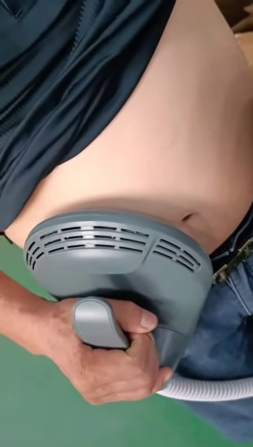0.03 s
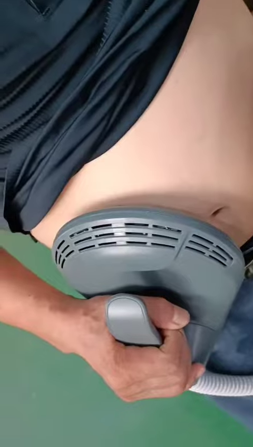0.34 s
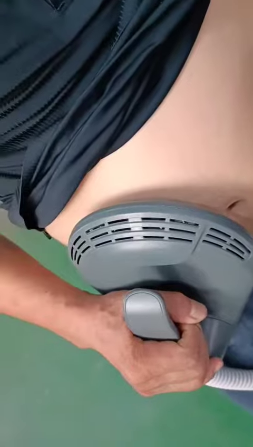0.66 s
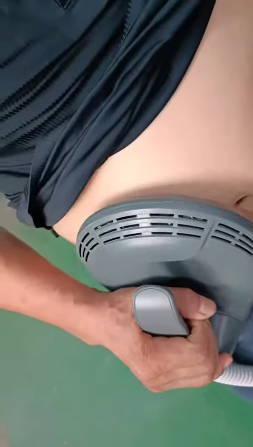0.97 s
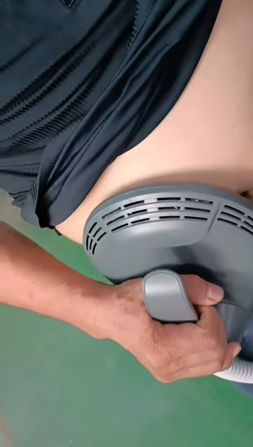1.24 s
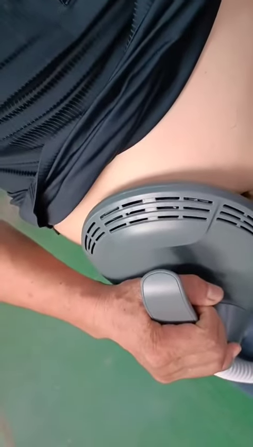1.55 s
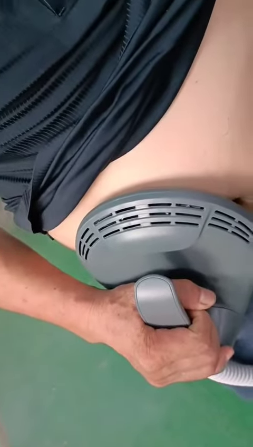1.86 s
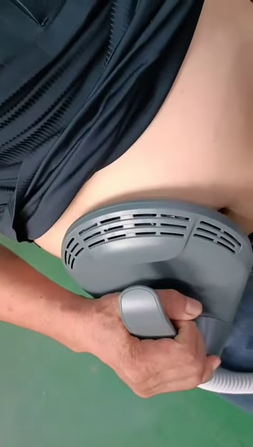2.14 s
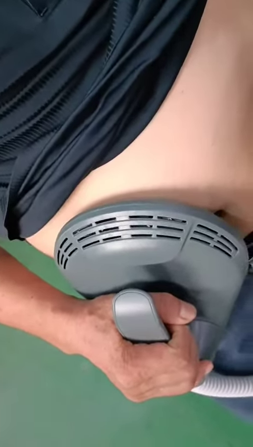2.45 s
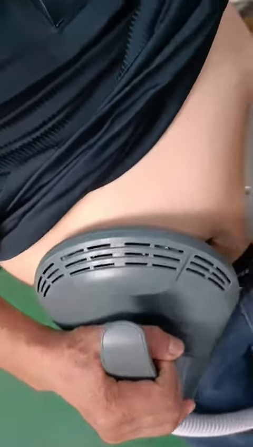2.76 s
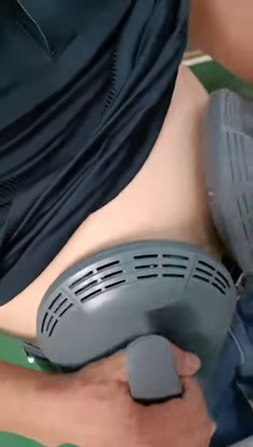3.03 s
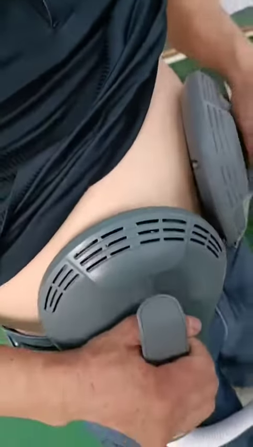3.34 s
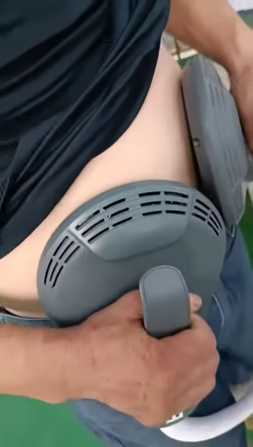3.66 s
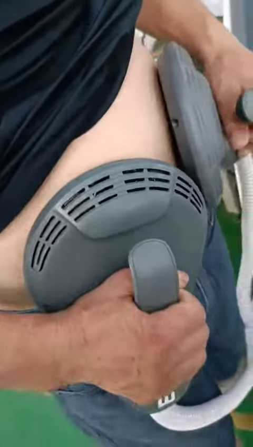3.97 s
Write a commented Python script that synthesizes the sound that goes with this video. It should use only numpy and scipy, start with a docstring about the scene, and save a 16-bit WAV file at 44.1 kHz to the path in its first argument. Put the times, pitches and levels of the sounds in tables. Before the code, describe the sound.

A handheld pulse device knocks and rattles close by in a room. At first there is only rushing fan air and a low rumble. At 0.7 seconds, with a soft handling bump, rapid, even plastic knocks begin, about 25 a second, and continue throughout. Near 3 seconds they turn rounder and roomier as the air grows louder. A rough swell and thin squeal come at about 3.9 seconds.

```python
"""A handheld magnetic-pulse applicator lies on a belly, cooling air rushing through its hose in a busy room.
At 0.7 s, with a soft handling bump, its coil starts to fire about 25 times a second; each pulse knocks
the plastic shell, which snaps, rings in its modes and rattles. Near 3 s the shell turns from the
microphone and the knock grows rounder and roomier. A rough swell with a thin squeal ends the scene."""
import sys
import numpy as np
from scipy import signal
from scipy.fft import rfft, irfft, next_fast_len
from scipy.io import wavfile

SR = 44100
rng = np.random.default_rng(int(sys.argv[2]) if len(sys.argv) > 2 else 0)


def transcribe(signal):
    """Save signal, clipped to [-1, 1], as a 16-bit WAV file at the path in sys.argv[1]."""
    frames = np.atleast_2d(signal).T
    limited = np.clip(frames, -1, 1)
    pcm = np.round(limited * 32767).astype(np.int16)
    wavfile.write(sys.argv[1], SR, pcm)


N = 176400
TIME = np.arange(N) / SR

# low rumble: (frequency [Hz], relative level [dB]) and (time [s], level [dB])
RUMBLE_SPECTRUM = [(20, -36), (45, -14.5), (100, -5.5), (160, -3), (220, 2.5), (310, -0.5), (400, -11),
                   (520, -6), (800, -14.5), (2000, -60)]
RUMBLE_ENVELOPE = [(0, -36.5), (.3, -41), (.52, -40.5), (.65, -34), (.7, -39), (1, -48.5), (1.6, -47.5),
                   (1.85, -43.5), (2.4, -48), (2.85, -38.5), (3.4, -40), (3.8, -43), (4, -40)]
# dull swells: (time [s], half-length [s], frequency [Hz], half-width [Hz], level [dB])
DULL_SWELLS = [(0.166, 0.027, 215, 70, -37), (0.312, 0.014, 160, 70, -33), (0.46, .01, 250, 100, -38),
               (0.638, 0.023, 590, 147, -30.5), (3.666, 0.066, 194, 67, -34), (3.928, 0.049, 246, 155, -26),
               (3.92, 0.077, 950, 775, -25)]
# cooling air: (frequency [Hz], relative level [dB]) and (time [s], level [dB])
AIR_SPECTRUM = [(200, -17), (350, -8.5), (520, -3.5), (730, -7), (1120, -6.5), (1230, -7), (1520, -5),
                (2450, -9), (3060, -16.5), (3700, -23), (4400, -18), (5200, -66), (8000, -70)]
AIR_ENVELOPE = [(0, -33), (.3, -32.5), (.66, -31.5), (.68, -38.5), (1.6, -41), (1.8, -40.5), (2.5, -41.5),
                (2.9, -32), (3.8, -32), (4, -29.5)]
# fan tones: (frequency [Hz], level relative to the air [dB], half-width [Hz])
FAN_TONES = [(1100, -10.5, 33), (1800, -18, 20), (2615, -19, 9.1), (3005, -20, 16), (6220, -27.5, 36),
             (5850, -41.5, 28)]
# vent hiss: (frequency [Hz], relative level [dB]) and (time [s], level [dB])
HISS_SPECTRUM = [(3000, -29), (4300, -10.5), (5000, -2), (6300, -5), (7800, -1), (9400, 2.5), (10500, -7.5),
                 (11800, -11), (12300, -35)]
HISS_ENVELOPE = [(0, -44.5), (.66, -47), (.8, -54), (1.6, -53.5), (1.85, -54), (2.5, -57), (3, -48),
                 (4, -62)]
# reverberation time of the room: (frequency [Hz], T60 [s])
ROOM_DECAY = [(300, 0.22), (1500, 0.51), (4000, 0.047), (10000, 0.41)]
# strength of the knocks: (time [s], gain [dB])
KNOCK_GAIN = [(.7, -1), (1.2, -1.5), (1.5, -3.5), (1.69, -4), (1.78, 0.5), (2.2, 0.16), (2.6, -1.4),
              (2.9, 0.5), (3.4, 0.5), (3.7, -0.5), (3.87, -0.5), (3.97, -3)]
# angle of the shell to the microphone: (time [s], turn [0 facing, 1 turned away])
SHELL_TURN = [(1.9, 0.4), (2.4, 0.27), (2.68, 0.45), (2.85, 0.89), (3.05, 1)]
# bright snap and housing rattle, each: (frequency [Hz], relative level [dB])
SNAP_SPECTRUM = [(3000, -49), (5000, -25), (7500, -8), (8700, -14.5), (9600, 6.5), (10600, 4), (11700, -1),
                 (12100, -14)]
RATTLE_SPECTRUM = [(350, -50), (600, -6.5), (1500, -3), (2400, -6.5), (3300, -5), (4300, -13),
                   (5000, -24.5), (5700, -16.5), (7400, -23), (8700, -11), (9400, -4), (10200, -12),
                   (11800, -19), (12200, -40.5)]
# shell modes: (frequency [Hz], T60 [s], gain facing [dB], gain turned away [dB])
SHELL_MODES = [(560.7, 0.021, -7.5, -3.5), (699.4, 0.044, -14, -6.5), (880, 0.044, -18, -14.5),
               (1060, 0.022, -4.5, -8), (1297, 0.029, -9, -8.5), (1440, 0.05, -20.5, -23.5),
               (1553, 0.017, -13, -12.5), (1698, 0.03, -15.5, -16), (1840, 0.041, -31, -26),
               (2050, 0.021, -25, -16.5), (2384, 0.028, -15, -15.5), (2467, 0.031, -11.5, -14.5),
               (2750, 0.021, -37, -16.5), (3076, 0.019, -33, -19.5), (3490, 0.009, -36, -25),
               (4120, 0.01, -20.5, -16.5)]
# radiation lobes sweeping past the microphone: (time [s], half-length [s], frequency [Hz], gain [dB])
RADIATION_LOBES = [(2.86, 0.35, 781, 12.5), (2.66, 0.076, 1220, -5), (3.24, 0.22, 1300, 4),
                   (2.67, 0.16, 1590, 5), (3.23, 0.11, 1760, 8.5), (2.94, 0.12, 952, 6),
                   (2.62, 0.15, 2470, 3.5), (3.05, 0.37, 2450, -4.5)]


def amp(db):
    """Amplitude ratio of a level in decibels."""
    return 10 ** (np.asarray(db) / 20)


def unit(x):
    """Normalisation to an rms of 1."""
    return x / np.sqrt(np.mean(x ** 2) + 1e-20)


def along(points, hz):
    """Interpolation of (frequency [Hz], value) points on a logarithmic axis."""
    frequencies, values = np.transpose(points)
    return np.interp(np.log(hz + 1), np.log(frequencies + 1), values)


def at(points, s):
    """Linear interpolation of (time [s], value) points."""
    return np.interp(s, *np.transpose(points))


def bell(x, centre, half_width):
    """Gaussian curve of height 1, falling to 1/e at the half-width."""
    return np.exp(-((x - centre) / half_width) ** 2)


def filtered(x, response):
    """Filtering as multiplication of the spectrum by a frequency response."""
    size = next_fast_len(N + SR // 2)
    return irfft(rfft(x, size) * response(np.fft.rfftfreq(size, 1 / SR)), size)[:N]


def minimum_phase(x, spectrum, size=4096):
    """Causal filtering: a minimum-phase response colours x, and nothing sounds before a hit."""
    cepstrum = irfft(np.log(amp(along(spectrum, np.fft.rfftfreq(size, 1 / SR)))))
    cepstrum[1:size // 2] *= 2
    cepstrum[size // 2 + 1:] = 0
    response = irfft(np.exp(rfft(cepstrum)))
    return signal.fftconvolve(x, response / np.linalg.norm(response))[:N]


def noise(spectrum):
    """Spectral shaping of white noise, at an rms of 1."""
    return unit(filtered(rng.standard_normal(N), lambda hz: amp(along(spectrum, hz))))


def band(centre_hz, half_width_hz):
    """Narrow-band noise with a Gaussian spectrum, at an rms of 1."""
    return unit(filtered(rng.standard_normal(N), lambda hz: bell(hz, centre_hz, half_width_hz)))


def rumble():
    """Shaped noise: a low rumble that dips once the knocks begin and comes back up near 3 s."""
    return amp(at(RUMBLE_ENVELOPE, TIME)) * noise(RUMBLE_SPECTRUM)


def swells():
    """Amplitude modulation: bands of noise rise and fall under Gaussian envelopes."""
    return sum(amp(db) * bell(TIME, s, half) * band(hz, width) for s, half, hz, width, db in DULL_SWELLS)


def handling_bump(centre_s=0.72, half_s=0.032, hz=220.6, db=-29.5):
    """A tone pulse: its smooth envelope makes the bump soft and pitched."""
    return amp(db) * bell(TIME, centre_s, half_s) * np.sin(2 * np.pi * hz * TIME)


def squeal(start_s=3.9, rise_s=0.02, hz=3130, db=-32.5):
    """A pure tone: without overtones it sounds thin."""
    return amp(db) * np.clip((TIME - start_s) / rise_s, 0, 1) * np.sin(2 * np.pi * hz * TIME)


def cooling_air():
    """Turbulent flow gives a broadband rush and a vent hiss; the fan adds fuzzy narrow-band tones."""
    tones = sum(amp(db) * band(hz, width) for hz, db, width in FAN_TONES)
    rush = amp(at(AIR_ENVELOPE, TIME)) * (noise(AIR_SPECTRUM) + tones)
    hiss = amp(at(HISS_ENVELOPE, TIME)) * noise(HISS_SPECTRUM)
    return rush + hiss


def reverberation(x, gain_db=-16.5, turned_db=4, delay_s=0.009):
    """Convolution with diffuse decaying tails, cross-faded as the hand and microphone move."""
    out = np.zeros(N)
    moments, spacing_s = np.linspace(0, N / SR, num=7, retstep=True)
    for moment in moments:
        hz, t, diffuse = signal.stft(rng.standard_normal(SR // 2), SR, nperseg=256)
        decay = np.exp(-np.log(1000) * t / along(ROOM_DECAY, hz)[:, None])
        tail = signal.istft(diffuse * decay, SR, nperseg=256)[1]
        crossfade = np.sqrt(np.maximum(1 - abs(TIME - moment) / spacing_s, 0))
        add(out, delay_s, signal.fftconvolve(x * crossfade, tail / np.linalg.norm(tail)))
    return out * amp(gain_db + turned_db * at(SHELL_TURN, TIME))


def add(track, s, sound):
    """Superposition of a sound on a track, starting at s seconds."""
    part = track[round(s * SR):][:len(sound)]
    part += sound[:len(part)]


def pulse_times(first_s=0.6995, rate_hz=25.145):
    """Periodic excitation: the coil fires at a strictly even rate."""
    return np.arange(first_s, N / SR, 1 / rate_hz)


def dense_ringing(spectrum, gain_db, turned_db, hold_s, t60_s, repeat_share, colour_db, scatter_db=1.17):
    """Modal overlap: crowded resonances merge into a noise burst, partly alike on every pulse."""
    out, t = np.zeros(N), np.arange(SR // 15) / SR
    envelope = np.exp(-np.log(1000) * np.maximum(t - hold_s, 0) / t60_s)
    envelope_rms = np.sqrt(np.mean(envelope ** 2))
    repeating = np.sqrt(repeat_share) * rng.standard_normal(len(t))
    for s in pulse_times():
        fresh = np.sqrt(1 - repeat_share) * rng.standard_normal(len(t))
        bins = rfft(repeating + fresh)
        colour = amp(colour_db * signal.resample(rng.standard_normal(60), len(bins)))
        burst = unit(envelope * irfft(bins * colour, len(t))) * envelope_rms
        db = gain_db + at(KNOCK_GAIN, s) + turned_db * at(SHELL_TURN, s)
        add(out, s, amp(db + scatter_db * rng.standard_normal()) * burst)
    return minimum_phase(out, spectrum)


def shell_knocks(lobes, lobe_octaves=0.14, passband_hz=(715, 4060)):
    """Free vibration: each pulse rings the same damped modes, and directivity sets their balance."""
    facing_attack_s, turned_attack_s = 0.00034, 0.00036
    knock_scatter_db, mode_scatter_db = 0.22, 0.66
    edge_hz, edge_scatter_db = 3300, 2  # the hard treble edge varies most from knock to knock
    out, t = np.zeros(N), np.arange(SR // 16) / SR
    hz, t60, facing_db, turned_db = np.transpose(SHELL_MODES)
    modes = -np.cos(2 * np.pi * hz[:, None] * t) * np.exp(-np.log(1000) * t / t60[:, None])
    for s in pulse_times():
        turn = at(SHELL_TURN, s)
        db = at(KNOCK_GAIN, s) + facing_db + turn * (turned_db - facing_db)
        for lobe_s, half_s, lobe_hz, lobe_db in lobes:
            db += lobe_db * bell(s, lobe_s, half_s) * bell(np.log2(hz / lobe_hz), 0, lobe_octaves)
        db += knock_scatter_db * rng.standard_normal() + mode_scatter_db * rng.standard_normal(len(hz))
        db += edge_scatter_db * rng.standard_normal() * (hz > edge_hz)
        attack_s = facing_attack_s + turn ** 2 * (turned_attack_s - facing_attack_s)
        add(out, s, amp(db) @ modes * (1 - np.exp(-t / attack_s)))
    return signal.sosfilt(signal.butter(4, passband_hz, 'band', fs=SR, output='sos'), out)


def applicator():
    """Direct and reverberant fields of knock, snap and rattle; the lobes colour only the direct knock."""
    snap = dense_ringing(SNAP_SPECTRUM, gain_db=-40, turned_db=8, hold_s=0.0061, t60_s=0.022,
                         repeat_share=0.18, colour_db=5.5)
    rattle = dense_ringing(RATTLE_SPECTRUM, gain_db=-34, turned_db=7.5, hold_s=0.0062, t60_s=0.12,
                           repeat_share=0.56, colour_db=3)
    direct = shell_knocks(RADIATION_LOBES) + snap + rattle
    return direct + reverberation(shell_knocks(lobes=[]) + snap + rattle)


def scene():
    """Superposition of all sources at one close microphone."""
    return (applicator() + cooling_air() + rumble() + swells() + handling_bump() + squeal())[None]


def record(dry):
    """Band limiting: an ideal low-pass filter removes the highest treble."""
    return filtered(dry[0], lambda hz: hz < 12150)[None]


dry = scene()
out = record(dry)
transcribe(out)
```